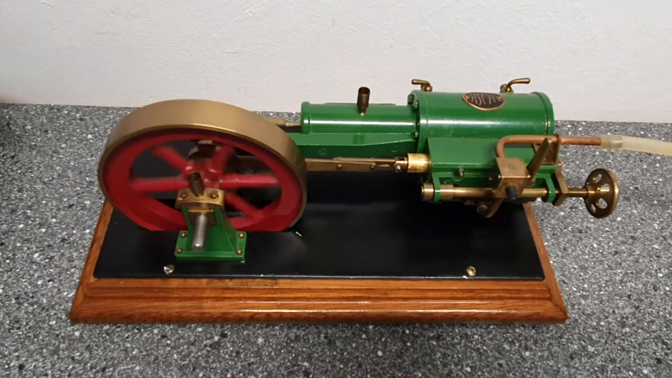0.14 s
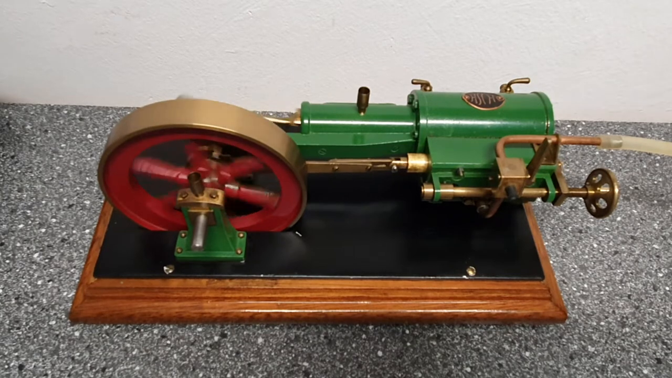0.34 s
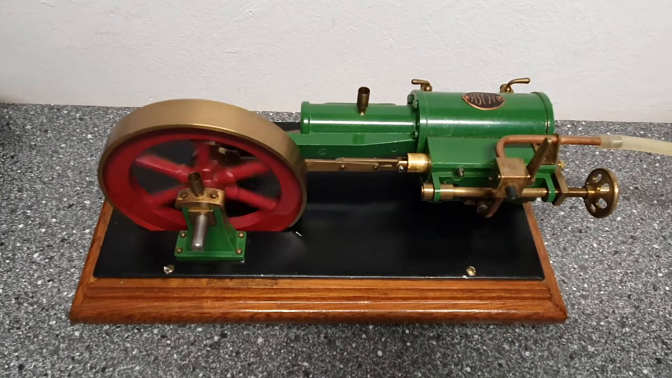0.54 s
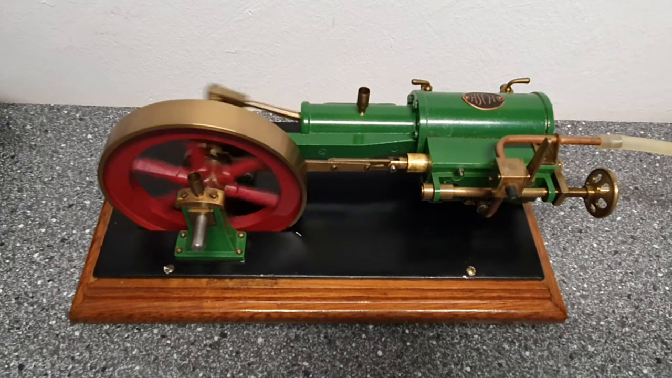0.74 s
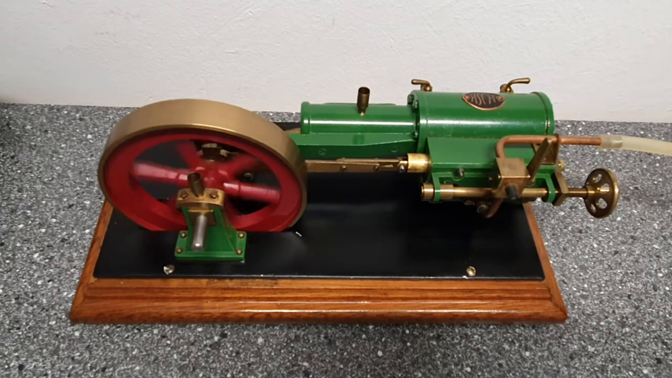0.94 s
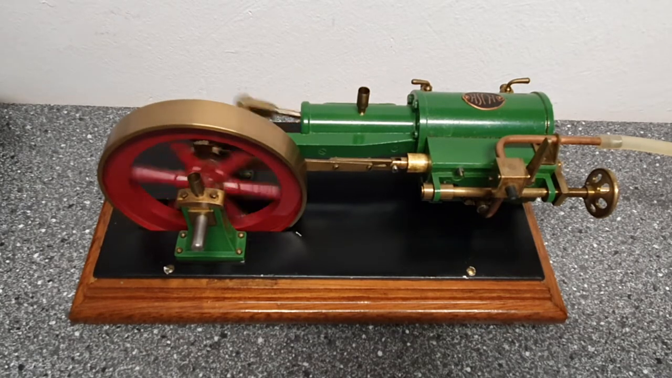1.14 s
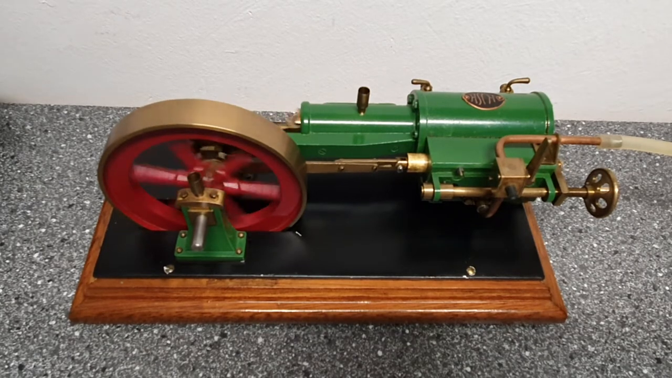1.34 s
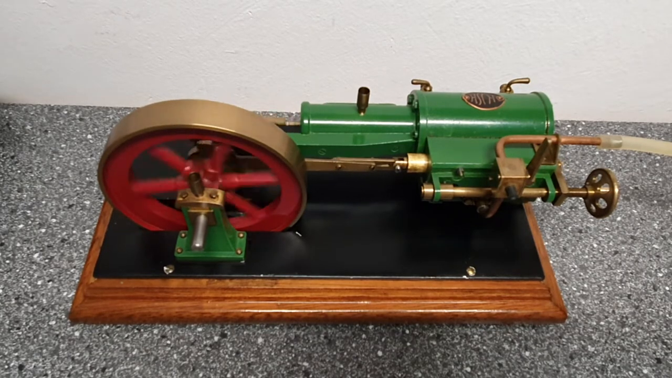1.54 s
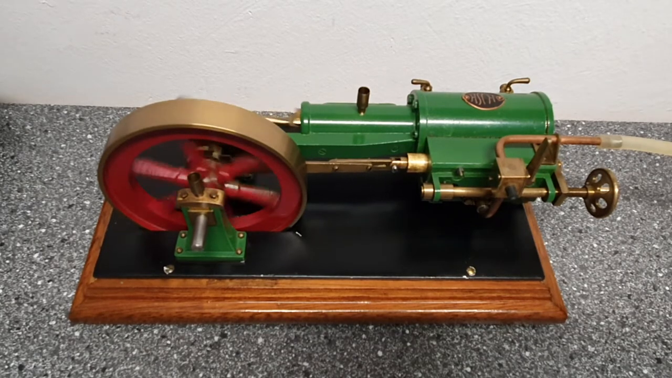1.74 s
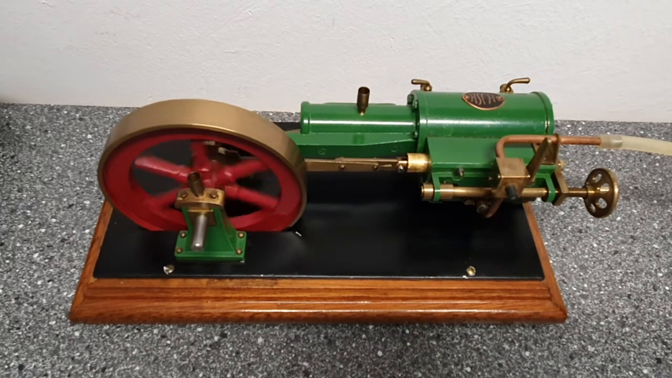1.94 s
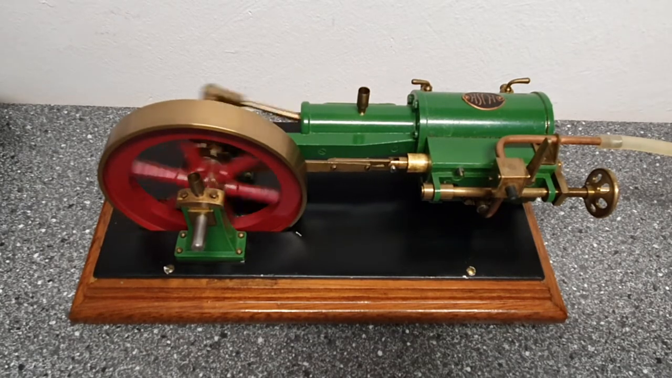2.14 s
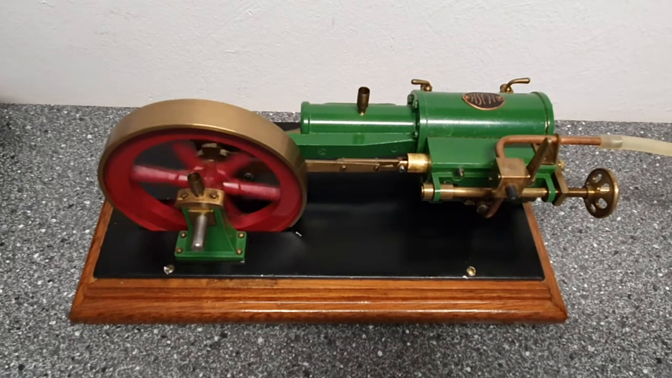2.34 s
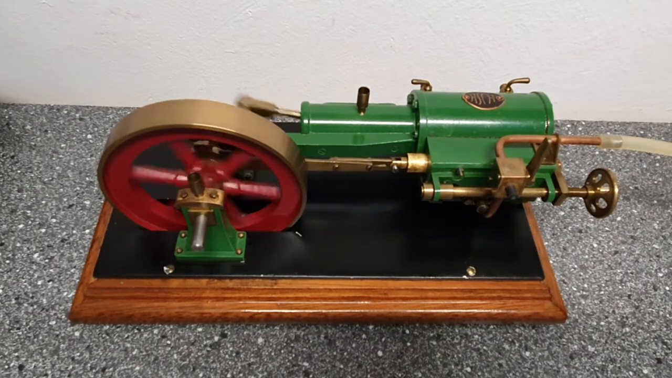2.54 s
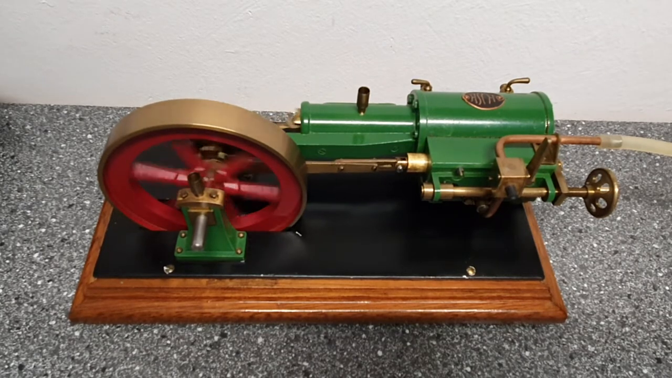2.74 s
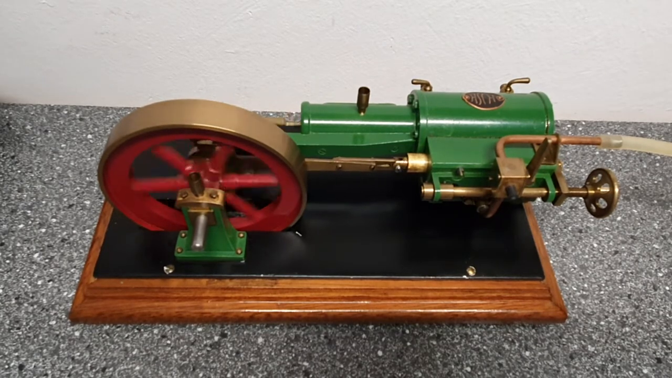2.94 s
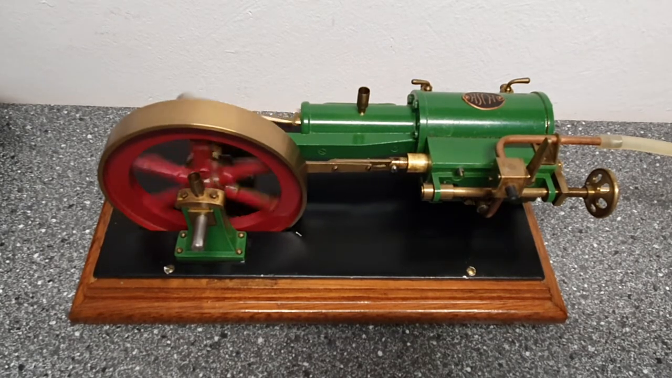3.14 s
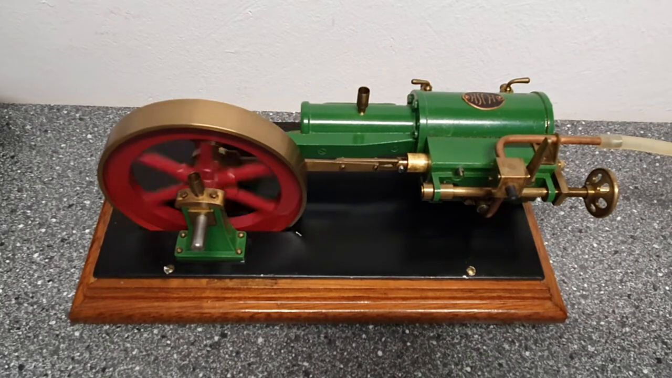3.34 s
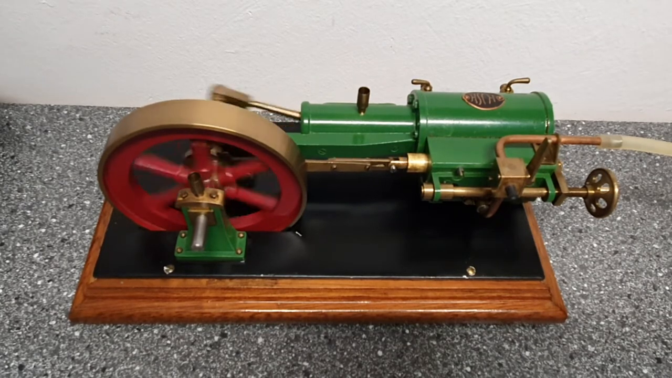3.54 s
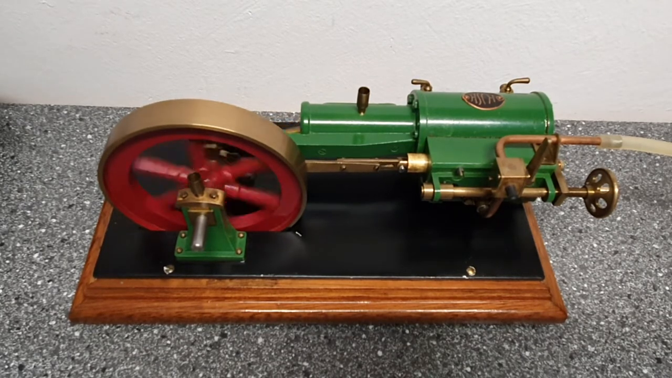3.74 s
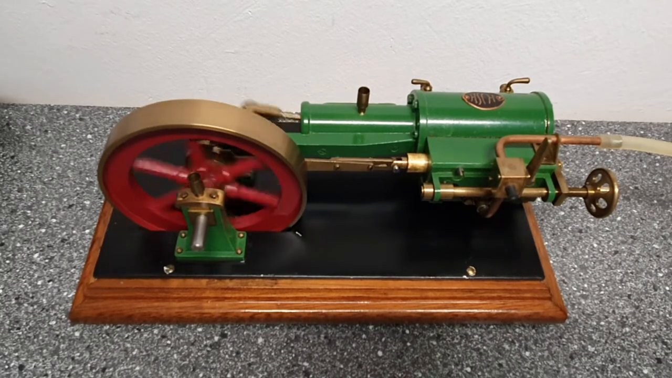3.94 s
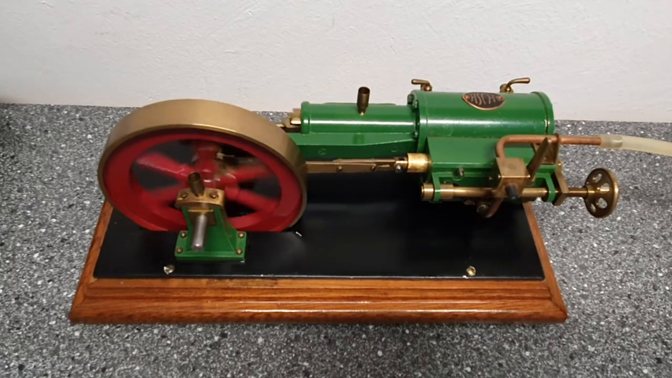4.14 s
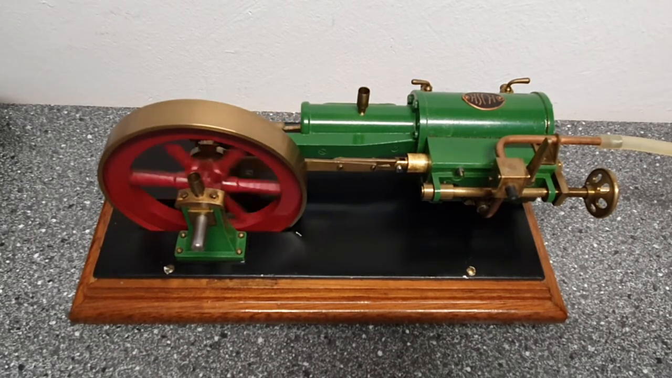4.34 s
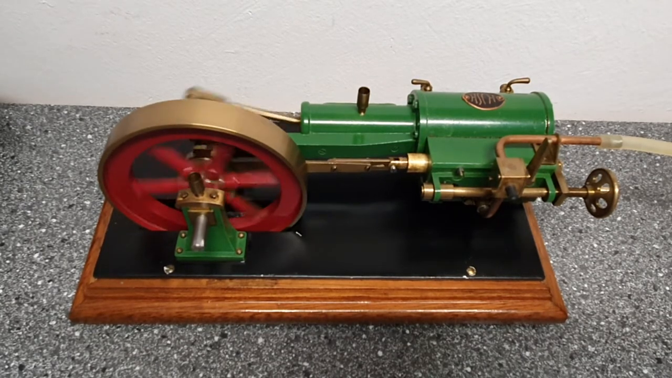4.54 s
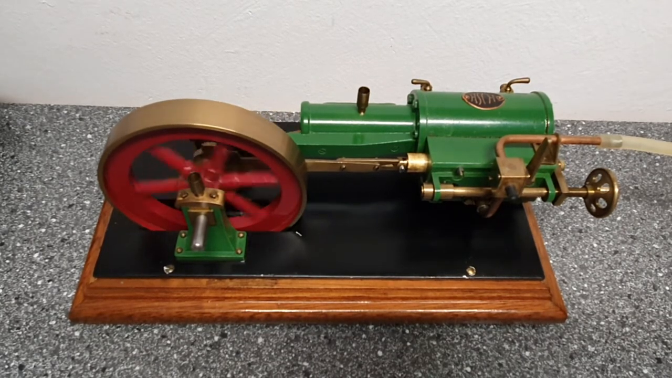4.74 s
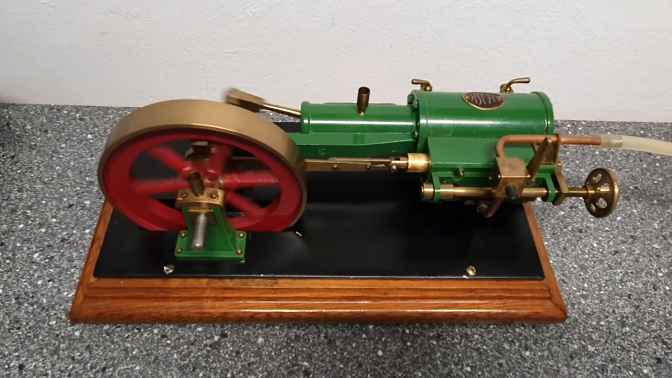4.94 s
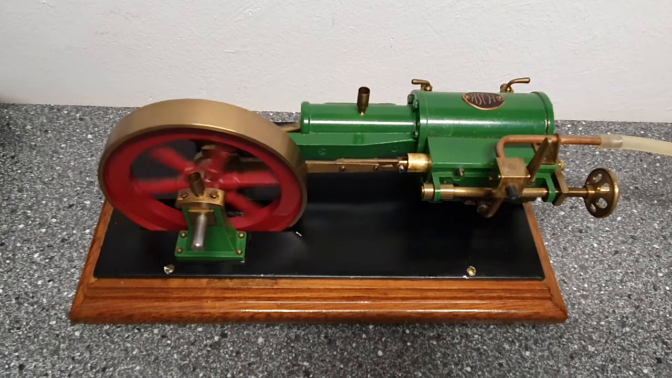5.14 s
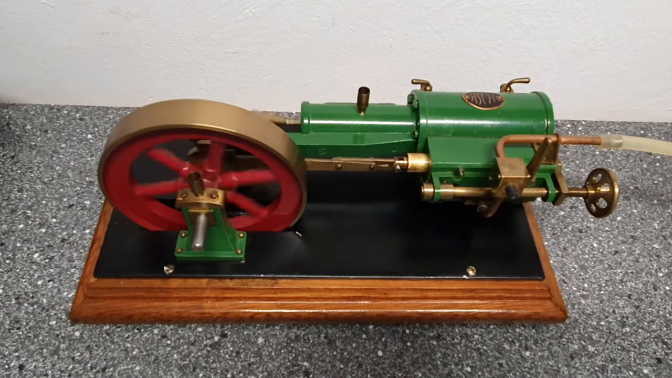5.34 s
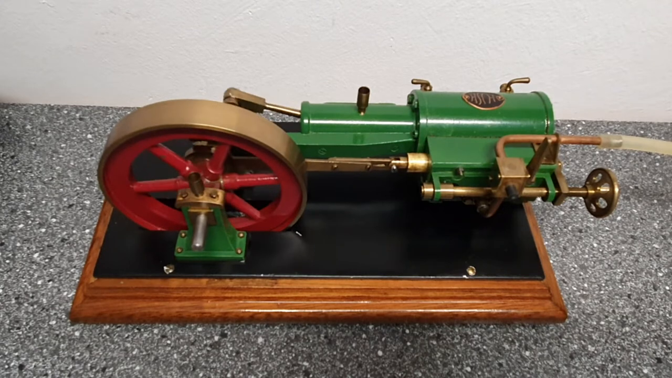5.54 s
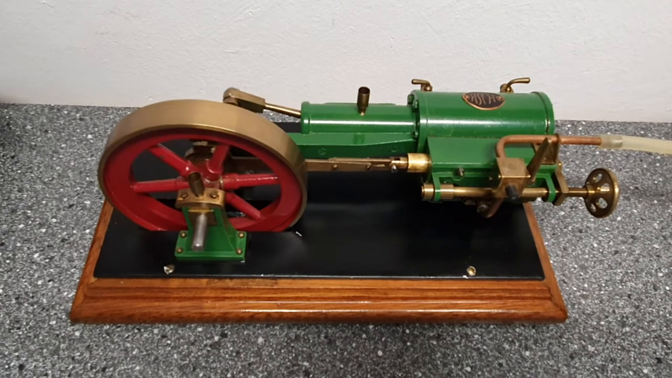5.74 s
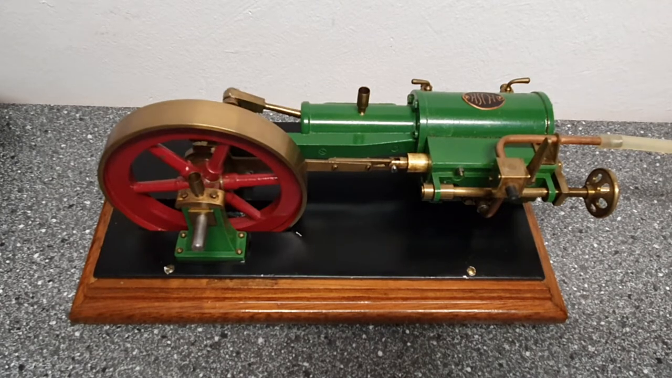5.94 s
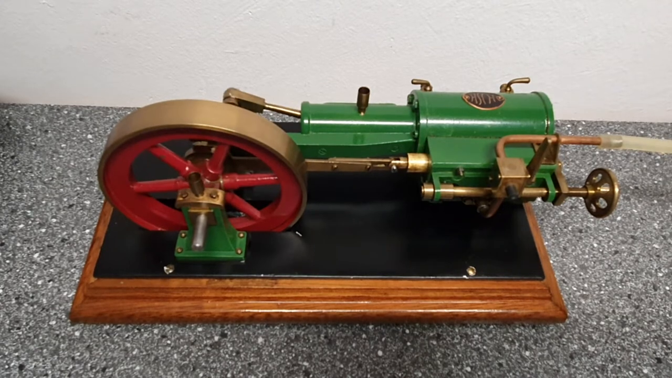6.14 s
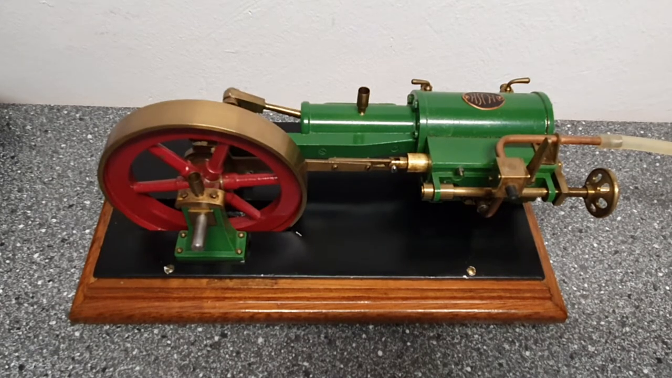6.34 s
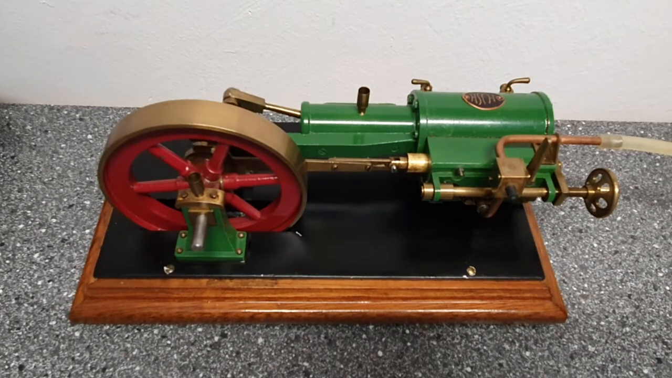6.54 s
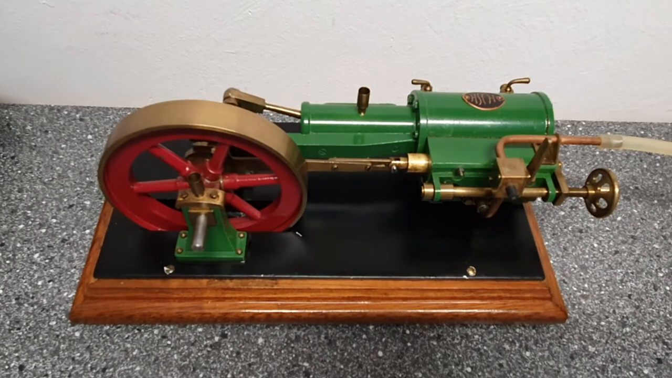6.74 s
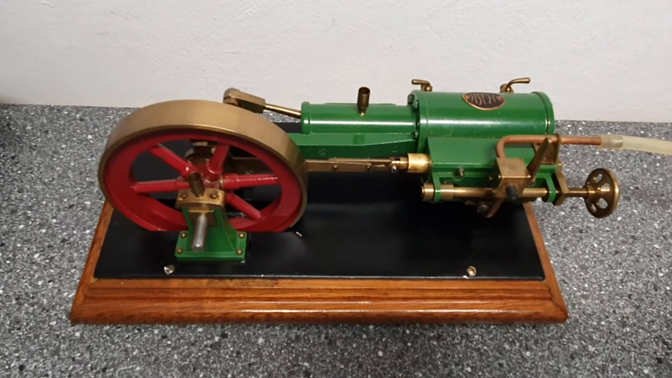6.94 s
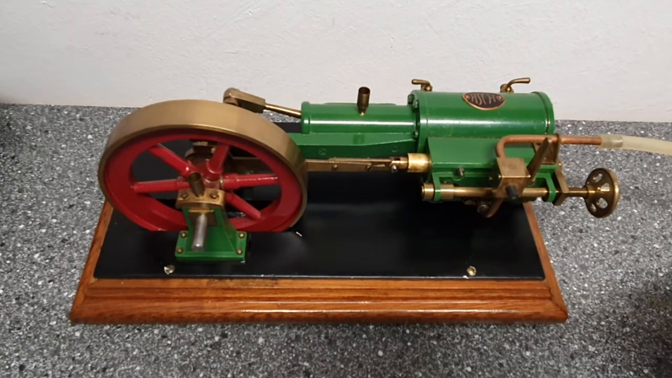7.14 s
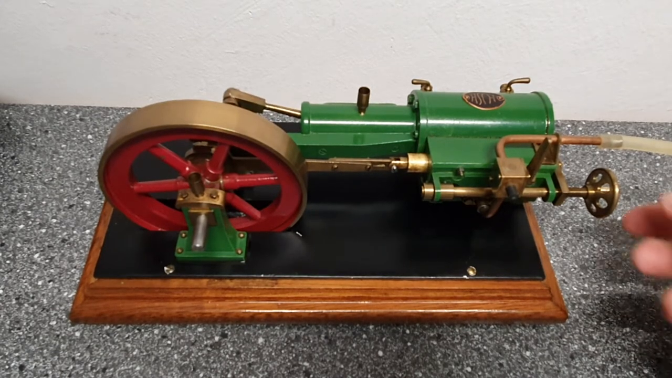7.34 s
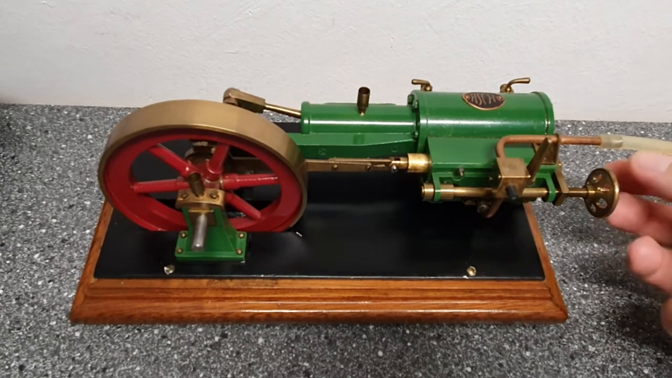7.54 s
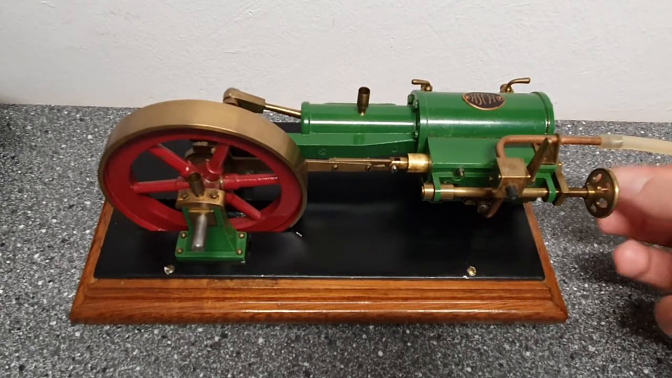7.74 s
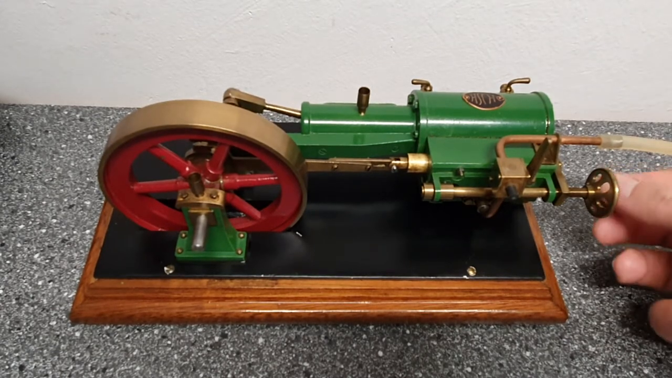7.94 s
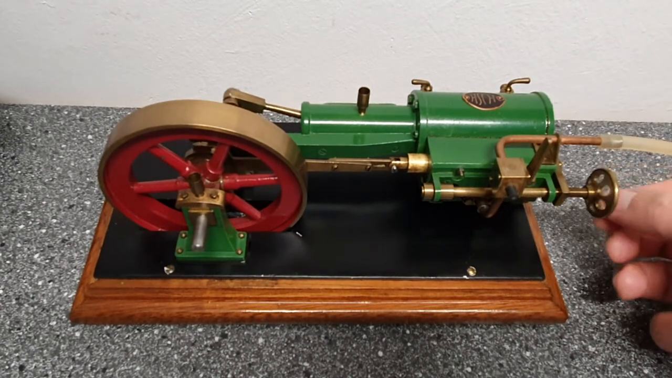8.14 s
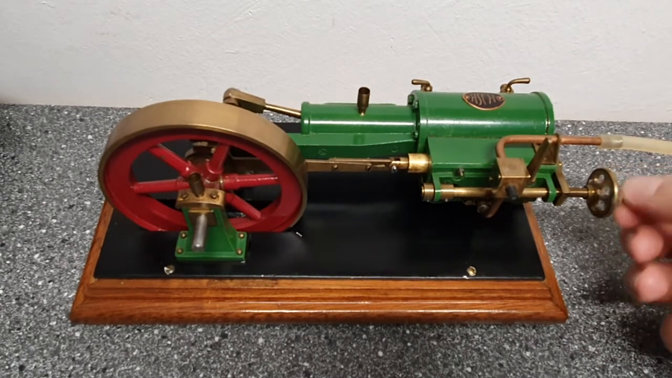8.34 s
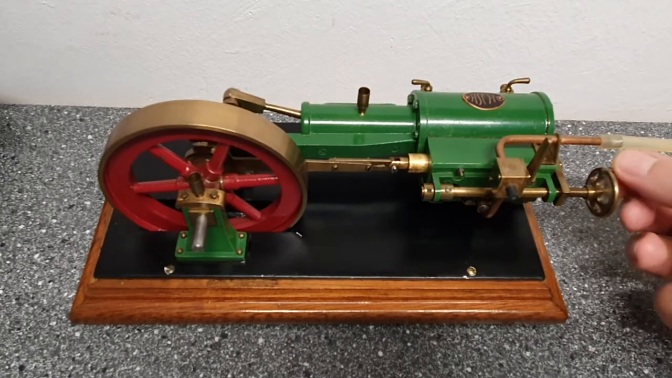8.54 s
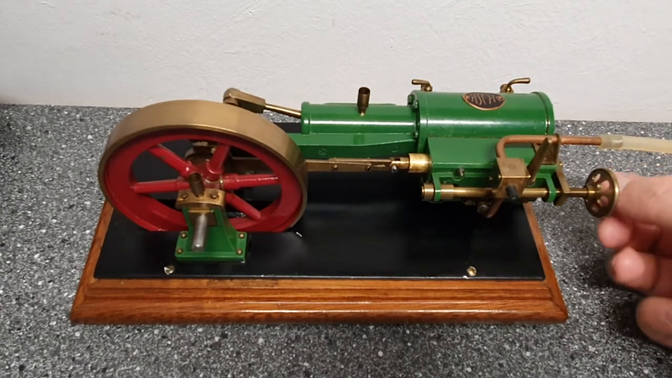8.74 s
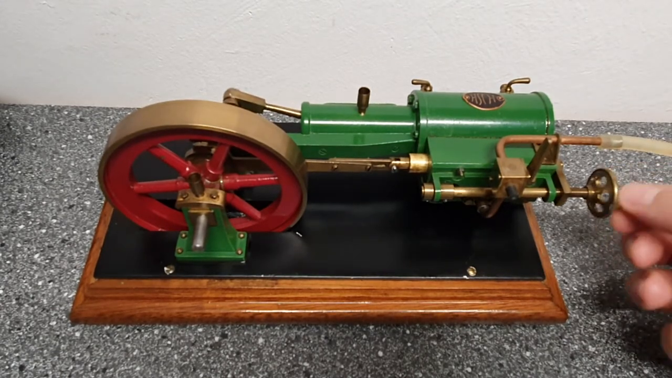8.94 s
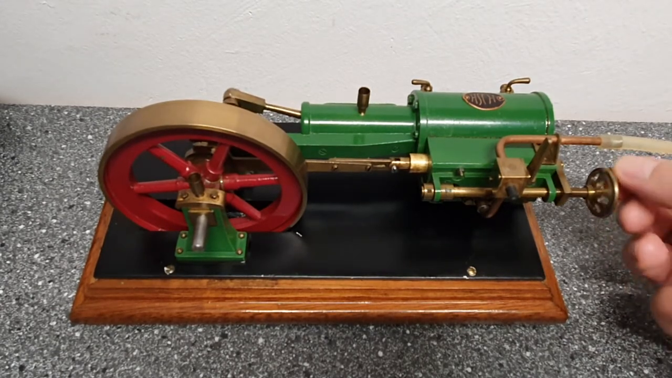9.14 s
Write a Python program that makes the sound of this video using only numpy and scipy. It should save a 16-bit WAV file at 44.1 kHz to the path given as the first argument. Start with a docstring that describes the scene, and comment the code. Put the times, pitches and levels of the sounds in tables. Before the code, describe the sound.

A small compressor hums fast under a pulsing engine hiss, labours, snaps off and coasts to rest; then faint rubs and squeaks in quiet.

```python
"""A hiss pulsing with a small model engine's crank, over the low hum of a piston compressor on the right.
Shaped noise makes the engine's jet and leak; multiples of the shaft speed make the hum. The air is shut
off, the compressor labours against the rising pressure, its switch snaps and it coasts to rest: struck
resonances make the blows, clacks and ticks. A hand then touches the engine's valve wheel in the quiet room,
with soft bumps, narrow-band rubbing and a wavering sine squeak."""
import sys
import numpy as np
from scipy import signal
from scipy.fft import rfft, irfft, next_fast_len
from scipy.io import wavfile
from scipy.ndimage import uniform_filter1d

SR = 44100
rng = np.random.default_rng(int(sys.argv[2]) if len(sys.argv) > 2 else 0)


def volts(x):
    """Linear amplitude factor 10**(x/20) for a level x in dB, scalar or array-like."""
    e = np.asarray(x, float) / 20
    return 10 ** e


def transcribe(u):
    """Save the signal u as a 16-bit wav file named by the first command-line argument.

    u: samples, shape (n,) or (channels, n), limited to [-1, 1]; the rate is SR.
    q: integer samples, one column per channel.
    """
    v = np.clip(np.atleast_2d(u).T, -1, 1)
    q = np.round(v * 32767).astype(np.int16)
    wavfile.write(sys.argv[1], SR, q)


N = 405719
T = np.arange(N) / SR
REST_S = 7.34  # the compressor stands still
MOVING = np.clip((REST_S - T) / 0.035, 0, 1)

# snap of the pressure switch: t/s, impulse level/dB
SNAP = [(7.0277, -27.5)]
SNAP_S = SNAP[0][0]
# modes of the compressor housing: f/Hz, relative level/dB, t60/s
HOUSING = [(70, -11, 0.079), (112, -15, 0.024), (176, -4.5, 0.053), (258, -11, 0.073), (286.3, -9, 0.089),
           (364, -7.5, 0.071)]
# modes of its thin casing: f/Hz, relative level/dB, t60/s
CASING = [(550, -10, 0.022), (664, -8, 0.021), (802, -6.5, 0.061), (854, -6, 0.045), (917, -0.5, 0.04),
          (1049, -3, 0.042), (982, 2, 0.049)]
# casing level law: free level/dB, limit of the change with load/dB, load for two thirds of it,
# change at the snap/dB, slope after it/(dB/s)
RING_LAW = (-39, -1.5, 4.5, -5, -35.5)


def compressor():
    """Superposition of shaft hum, struck casing and valve flow, all tied to one shaft phase."""
    # load on the compressor: t/s, load (0 free, 1 straining, 2 near stall)
    load_course = [(5.47, 0.043), (5.7, 0.4), (6.1, 1.1), (6.8, 2.07), (7.08, 1.53)]
    turns, load = shaft(), curves(load_course)[0]
    whole = np.arange(int(turns[-1]) + 1)
    opening = np.interp(whole[1:] - .09, turns, T)
    spit = valve_spit(turns)
    return (hum(turns, load) + casing_blows(turns, load, whole) + coasting()
            + valve_clack(opening, spit, load) + valve_air(opening, spit, load) + whir(load))


def shaft():
    """Phase is the integral of speed: the motor sags under load, then the flywheel brakes steadily."""
    # powered shaft speed: t/s, speed/(turns/s)
    speed = [(0, 23.601), (5.45, 23.601), (5.8, 22.645), (6.1, 22.373), (6.7, 19.85), (7.03, 19.56)]
    first_turn, coast_hz, brake_hz_per_s = .384, 17.4, 32
    free = T - SNAP_S
    coast = (coast_hz - brake_hz_per_s * free) * (T < REST_S) + 1e-3  # never quite zero
    hz = np.where(free < 0, curves(speed)[0], coast)
    return first_turn + np.cumsum(hz) / SR


def effort(law, load):
    """Saturation: the level in dB moves with load towards a limit, and falls away once the power is cut."""
    free_db, limit_db, knee, cut_db, fade_db = law
    off = T - SNAP_S - .02
    change_db = limit_db * (1 - np.exp(-load / knee))
    return free_db + change_db + (cut_db + fade_db * off) * np.clip(off / 0.033, 0, 1)


def hum(turns, load):
    """Harmonic series of a periodic force, two thumps a turn, filtered by room and floor resonances."""
    # the two thumps: load, phase of first/turn, phase of second/turn, lean of first/cycle
    thumps = [(0, .435, .995, -.28), (1, .48, .86, .07), (2, .48, .81, .16)]
    # room and floor resonances: f/Hz, half width/Hz, rms level at the peak/dB
    resonances = [(42.9, 2.9, -41), (66.57, 4.23, -34), (79.2, 2, -37), (93.8, 2.5, -42), (117.3, 9.5, -39),
                  (143.3, 8.3, -40.5), (168.3, 10.9, -38.5), (204, 5.5, -47.5), (258, 8.8, -51),
                  (288.7, 5, -42), (315.5, 15, -45), (369.8, 14.8, -42.5), (426, 5.1, -52),
                  (449.5, 5.2, -62), (520, 11, -54.5), (562.5, 6, -54.5), (614, 7.5, -55), (661, 8, -55),
                  (692, 14, -61.5), (773, 15, -51), (818.7, 11, -47), (870, 12, -52), (910, 9.7, -46.5),
                  (995, 10, -45), (1044, 12, -46.5), (1080, 12, -55.5)]
    second_size, second_lean, multiples = .8, .2, 46  # lean in cycles
    bass_below_hz, bass_db = 160, -4.5  # the bass sags once the load passes 1
    shade_above_hz, shade_db = 810, -6.5  # the top is shaded from the left port
    thin_above_hz, thin_db, waver_db = 460, -1.5, 0.9  # per unit of load: upper fade, waver of all
    late_above_hz, late_rad = 220, 0.63  # the upper resonances reach the left port later still
    slow = slice(0, None, 100)
    first, second, lean = curves(thumps, load[slow])
    hz = np.gradient(turns)[slow] * SR
    turn = np.exp(2j * np.pi * turns)
    out, multiple = 0, 1
    for k in range(1, multiples + 1):
        multiple = multiple * turn
        pair = np.exp(2j * np.pi * (lean - k * first))
        pair = pair + second_size * np.exp(2j * np.pi * (second_lean - k * second))
        # neighbouring resonances swing in opposite senses and cancel between them
        boom = sum((-1) ** j * volts(db) / (1 + ((k * hz - f) / w) ** 2)
                   for j, (f, w, db) in enumerate(resonances))
        strain_db = thin_db / (1 + (thin_above_hz / (k * hz)) ** 12) + waver_db * walk(9)[slow]
        sag_db = bass_db * np.maximum(load[slow] - 1, 0) / (1 + (k * hz / bass_below_hz) ** 8)
        size = np.sqrt(2) * abs(boom) * volts(load[slow] * strain_db + sag_db)
        wave = np.interp(T, T[slow], size * pair / abs(pair)) * multiple
        late = late_rad / (1 + (late_above_hz / (k * hz[0])) ** 6)
        shade = volts(shade_db / (1 + (shade_above_hz / (k * hz[0])) ** 16))
        out = out + np.array([(wave * np.exp(-1j * late)).real * shade, wave.real])
    return out * np.clip((SNAP_S + 0.028 - T) / 0.033, 0, 1)


def casing_blows(turns, load, whole):
    """Impulse excitation: soft blows at set shaft phases ring the modes of the thin casing."""
    # blows in one turn: phase/turn, relative level/dB
    blows = [(0.358, -7), (0.471, 4.5), (0.861, 2.5)]
    ring_db = effort(RING_LAW, load)
    force = np.zeros(N)
    for share, db in blows:
        at = whole + share + 0.0054 * rng.standard_normal(len(whole))
        at = np.interp(at[(at > turns[0]) & (at < turns[-1])], turns, T)
        force += clicks(at, db + np.interp(at, T, ring_db) + 2.9 * rng.standard_normal(len(at)))
    return volts(-2.5 + 1.5 * load) * indoors(ring(push(force, 0.00092), CASING), -1.9, .13)


def coasting():
    """Free decay of the housing modes after each thump of the unpowered machine."""
    # coasting thumps: t/s, impulse level/dB
    thumps = [(7.053, -29.5), (7.073, -28.5), (7.116, -29), (7.141, -34), (7.168, -39.5), (7.189, -29),
              (7.236, -32), (7.262, -42.5), (7.282, -30), (7.317, -46.5)]
    modes = HOUSING + [(780, 0.5, 0.06), (990, -10.5, .035)]
    return ring(-push(clicks(*np.transpose(thumps)), 0.0016), modes)


def valve_spit(turns):
    """Flow pulse of the delivery valve: a quick rise and exponential decay once a turn."""
    since = ((turns + 0.12) % 1) / np.maximum(np.gradient(turns) * SR, 1)  # seconds
    return since / .002 * np.exp(-since / 0.0052)


def valve_clack(opening, spit, load):
    """Repeated impact: the valve plate lands and bounces, and with the spit it rings the valve head."""
    # landing and bounces: delay after opening/s, relative level/dB
    bounces = [(.004, -2.5), (.0065, -11), (.014, -10), (0.019, -14)]
    # modes of the valve head: f/Hz, relative level/dB, t60/s
    head = [(965, 2, 0.035), (1187, 1.5, 0.018), (1296, 4.5, 0.028), (1453, 2, .022), (1550, 1.5, 0.018),
            (1750, 0, 0.02), (1771, -8.5, 0.034), (2540, -27.5, 0.025)]
    # clack level law: columns as in RING_LAW
    clack_law = (-48.5, 16, .7, -14.5, -80)
    plate = np.zeros(N)
    for delay, db in bounces:
        chance = rng.standard_normal((len(opening), 2))
        plate += clicks(opening + delay + .0001 * chance[:, 0], db + .8 * chance[:, 1])
    # under load the plate lands harder, so brighter
    hard = np.clip(.4 * load, 0, 1)
    landing = (1 - hard) * push(plate, 0.00051) + hard * push(plate, 0.0004)
    landing = lowpass(landing, 4, 1900)
    clack = level(ring(landing + .008 * spit * rng.standard_normal(N), head), 0)
    return indoors(clack * volts(effort(clack_law, load)) * MOVING, -12, .13)


def valve_air(opening, spit, load):
    """Turbulent flow noise gated by the valve, with pipe resonances and chattering fittings."""
    # spectrum of the air let through: f/Hz, gain/dB
    puff = [(1120, -29.5), (1900, -1), (2360, -5.5), (2560, -1), (2770, -4.5), (3900, -8.5), (5490, -11),
            (8010, -1.5), (9330, -16), (12100, -6), (13600, -5.5), (15300, -9.5), (16300, -29.5)]
    # pipe resonances: f/Hz, relative level/dB, t60/s
    pipe = [(6820, 0, .015), (8260, -2, .015), (12300, -1, .012), (13800, -1, .012)]
    # modes of loose fittings: f/Hz, relative level/dB, t60/s
    fittings = [(2150, -4.5, .03), (2620, 0, 0.033), (3830, -2, .025), (4550, -3.5, .02)]
    # air level law: columns as in RING_LAW
    air_law = (-63.5, 20, 0.95, -2, -44)
    gush = (spit * volts(-220 * np.maximum(T - SNAP_S, 0)) + .04) * noise(0.13)
    # a duller seep goes on between the spits
    seep = lowpass(colour(noise(.3), puff), 2, 3800)
    # loose fittings chatter at random, and ring when the plate has landed
    chatter = ring((rng.random(N) < 90 / SR) * rng.standard_normal(N), fittings)
    chance = rng.standard_normal((len(opening), 2))
    jolts = clicks(opening + .016 + .002 * chance[:, 0], 3.0 * chance[:, 1] - 60 * (opening > SNAP_S))
    loose = level(chatter, 0) + level(ring(jolts, fittings), 4.5)
    between = level(seep, 1.5) * volts(-4.5 * load) + level(loose, -13)
    between = between * MOVING * volts(-11 * (T > SNAP_S))
    whistle = level(ring(np.gradient(gush, axis=1), pipe), -11.5)
    air = level(colour(gush, puff), 0) + between + whistle
    return indoors(air * volts(effort(air_law, load)), -7.0, .11)


def whir(load):
    """Random excitation: steady noise keeps the housing and casing modes sounding."""
    whir_db = effort(RING_LAW, load) - 4.8 * (T > SNAP_S) - 1.6 * load
    sound = level(ring(rng.standard_normal(N), HOUSING + CASING), -3.5) * volts(whir_db)
    return indoors(sound * MOVING, -0.84, 0.092)


def engine():
    """Amplitude modulation: jet noise and gland leak follow the crank; a double knock each turn."""
    # start of exhaust: t/s, level change at the start of the chuff/dB, impulse level of the turn's knock/dB
    crank_starts = [(0.014, -0.5, -30.5), (0.4813, -0.5, -38), (0.9434, -2.7, -36), (1.4078, -1.5, -36),
                    (1.8758, -2, -38.5), (2.3394, -0.7, -33.5), (2.809, -1.5, -34.5), (3.2852, -2.5, -33),
                    (3.7534, -2, -35.5), (4.238, -3, -35), (4.7069, -2, -32), (5.1906, -2, -32)]
    # exhaust jet spectrum: f/Hz, gain/dB
    exhaust_tone = [(650, -43.5), (1100, -3.5), (1410, -15.5), (1560, -3.5), (1830, -10), (2200, -2),
                    (3500, -12.5), (3890, -8.5), (5500, -4.5), (6410, -1.5), (7060, 1), (7630, 4),
                    (8080, 3), (9160, -36), (11000, -13), (14300, -64), (22000, -120)]
    # exhaust port resonances: f/Hz, relative level/dB, t60/s
    port = [(2480, -6, 0.02), (6800, -7, 0.029), (7700, -8.5, 0.055), (7500, -6.5, 0.007)]
    # gland leak spectrum: f/Hz, gain/dB
    leak_tone = [(5000, -9), (8500, 2.5), (8840, 0), (9700, 0), (10600, 1.5), (12000, 8), (12900, 2),
                 (13700, 6.5), (15300, 5.5), (16000, -47.5)]
    # modes of the board: f/Hz, relative level/dB, t60/s
    board = [(250, 5, 0.16), (281, 3.5, 0.12)]
    last_turn_s = 0.64  # without air the wheel slows
    knock_at, slack_at, slack_db = .455, .36, 1  # turns; the slack in the rod knocks first
    air_db, shut_off_s, fade_db_per_s = 2, 5.352, -170
    s, chuff_db, knock_db = np.transpose(crank_starts)
    s = np.concatenate([[2 * s[0] - s[1]], s, [s[-1] + last_turn_s]])
    crank = np.interp(T, s, np.arange(len(s))) % 1
    exhaust_db, leak_db, top_db = stroke(crank)
    # each chuff starts with its own strength
    exhaust_db = exhaust_db + np.interp(T, s[1:-1], chuff_db) * np.exp(-crank / 0.097)
    jet = noise(0.56)
    whistle = level(ring(np.gradient(jet, axis=1), port), -54.5)
    jet = level(colour(jet, exhaust_tone), -32.5) + whistle
    # the lower part of the jet swings wider with the flow
    low = lowpass(jet, 2, 3200)
    exhaust = jet + low * (volts(.5 * exhaust_db + 2.5) - 1)
    exhaust = exhaust * volts(exhaust_db + 0.8 * walk(21.95))
    leak = level(colour(noise(0.75), leak_tone), -36.5)
    top = colour(leak, [(12500, -40), (13100, 0)])
    leak = (leak + top * (volts(top_db) - 1)) * volts(leak_db + 0.63 * walk(18))
    hiss = (exhaust + leak) * volts(air_db + fade_db_per_s * np.maximum(T - shut_off_s, 0))
    start, turn = s[1:-1], np.diff(s)[1:]
    blows = clicks(start + knock_at * turn, knock_db)
    blows = blows + clicks(start + slack_at * turn, knock_db + slack_db)
    return indoors(hiss, -3.0, .08) + ring(push(blows, 0.0041), board)


def stroke(crank):
    """Flow follows the crank angle: the outward stroke is louder than the return, with swells and dips."""
    # swells and dips: phase/turn, width/turn, exhaust change/dB, gland leak change/dB,
    # extra change of the leak's top/dB
    swells = [(.022, 0.025, 7.5, 4, -1), (.23, .04, 1, -0.1, 0.2), (.37, 0.04, -1.5, 3, -0.5),
              (.41, 0.04, 4, -1, -1), (.55, .035, -1, 3, 2), (.92, 0.04, -2, 2.2, 0.5),
              (.98, .03, 0, 0.5, 5)]
    out_db, return_db, leak_out_db, leak_return_db, return_at = -3.5, -6, -1.5, -3, .46
    back = np.clip((crank - return_at) / 0.0088, 0, 1) * np.clip((1 - crank) / 0.0067, 0, 1)
    exhaust_db = out_db + (return_db - out_db) * back
    leak_db = leak_out_db + (leak_return_db - leak_out_db) * back
    top_db = 0
    for share, width, a_db, b_db, c_db in swells:
        bell = np.exp(-(((crank - share + .5) % 1 - .5) / width) ** 2 / 2)
        exhaust_db, leak_db, top_db = exhaust_db + a_db * bell, leak_db + b_db * bell, top_db + c_db * bell
    return exhaust_db, leak_db, top_db


def switch():
    """Modal ringing after one hard snap with a short rattle, then faint ticks as things settle."""
    # switch modes: f/Hz, relative level/dB, t60/s
    modes = [(1266, -14, 0.02), (1890, -20.5, .006), (2650, -14, 0.013), (3160, -8.5, .008),
             (4100, -12, 0.0056), (4790, -3, 0.022), (4970, -2, 0.025), (5490, -7.5, 0.014),
             (6480, -4, 0.044), (6600, -12, 0.04), (6750, -6.5, .03), (7150, 0, 0.05), (7330, -2, 0.04),
             (7500, 0, 0.008), (8060, -8.5, .03), (8200, -7.5, 0.051), (9830, -14, 0.03),
             (13800, -15.5, 0.0101)]
    # ticks: t/s, peak level at the source/dB, f/Hz
    tick_list = [(7.091, -46, 2640), (7.147, -42, 2650), (7.148, -58, 4750), (7.148, -60, 4150),
                 (7.165, -54, 1730), (7.168, -48, 980), (7.195, -48, 780), (7.206, -47, 2620),
                 (7.241, -58, 4550), (7.24, -58, 3430), (7.255, -45, 2600), (7.263, -52, 1070),
                 (7.285, -63, 2150), (7.288, -45, 796), (7.3, -71, 2160), (7.347, -72, 2700),
                 (7.447, -50.5, 2650), (7.541, -74, 2700), (7.642, -67, 2650), (7.752, -79, 2700)]
    i = np.arange(600)
    rattle = 0.15 * rng.standard_normal(600) * np.exp(-i / 90.0) + 4.3 * (i == 0)
    snap = signal.fftconvolve(clicks(*np.transpose(SNAP)), rattle)[:N]
    snap = indoors(indoors(ring(snap, modes), -6, 0.15), -23.5, 0.27)
    scratch = np.gradient(push(rng.standard_normal(600), .0001))[:600] * np.hanning(600)
    ticks = 0
    for s, db, hz in tick_list:
        ticks = ticks + narrow(clicks([s], [db]), hz, 0.027)
        ticks = ticks + signal.fftconvolve(clicks([s], [db - 13]), scratch)[:N]
    return snap + indoors(ticks, -12, 0.036) * volts([[3], [-3]])


def hand():
    """Contact and friction: dull bumps through the board; the turned wheel rubs and squeaks."""
    # soft bumps: t/s, peak level/dB, f/Hz
    bump_list = [(8.19, -64, 250), (8.642, -55, 240), (8.672, -50, 200), (8.72, -59, 245),
                 (9.057, -46, 258), (9.059, -61, 430), (9.068, -43.5, 258), (9.181, -59, 240)]
    # rubbing bands of the wheel: f/Hz, width/Hz, relative level/dB
    wheel = [(805, 51, -5), (994, 51, 7), (583, 250, -14), (1346, 90, -19)]
    # nudges of the wheel: loudest t/s, length/s, rub gain/dB, squeak gain of the spindle/dB
    nudges = [(8.201, 0.019, -66, -100), (8.33, .03, -74, -83), (8.417, 0.071, -65.5, -82),
              (8.58, 0.075, -83, -101.5), (8.683, 0.052, -77, -82), (8.745, .07, -80, -90),
              (8.885, .04, -87, -105), (8.991, 0.055, -76, -83), (9.065, .07, -75, -100),
              (9.181, 0.039, -71, -92)]
    out = sum(narrow(clicks([s], [db]), hz, 0.062) for s, db, hz in bump_list)
    rub = sum(level(narrow(rng.standard_normal(N), hz, 1.73 / w), db) for hz, w, db in wheel)
    phase = 2 * np.pi * np.cumsum(3400 + 18 * walk(90)) / SR
    squeak = level(np.sin(phase) * volts(1.5 * walk(60)), 0)
    for s, length, rub_db, squeak_db in nudges:
        out = out + np.exp(-(2 * (T - s) / length) ** 2) * volts(rub_db) * rub
        out = out + np.exp(-((T - s) / length) ** 2) * volts(squeak_db) * squeak
    return out


def room():
    """Broadband and resonant noise: faint air and a low rumble that settles after the stop."""
    # room tone spectrum: f/Hz, gain/dB
    tone = [(100, -41.5), (170, -16), (249, 4.5), (312, -13), (1380, -21), (2300, -25.5), (2480, -22.5),
            (2890, -22), (5840, -33), (7920, -20), (8870, -41), (16000, -37)]
    rumble_db, settle_db, settle_s = -68, 18.5, 0.11  # louder while the machine moves
    modes = [(45.05, -9.5, 0.41), (90.3, -6.0, 0.33), (124, -4.5, 0.1), (245, -13.5, 0.11)]
    air = level(colour(noise(0.14), tone), -76.5)
    rumble = level(ring(rng.standard_normal(N), modes), 0)
    settling = np.exp(-np.maximum(T - REST_S + 0.046, 0) / settle_s)
    throb = level(ring(rng.standard_normal(N), [(80, 0, .3)]), -61.5)
    throb = throb * volts(-12 * np.maximum(T - REST_S, 0))
    return air + throb + rumble * volts(rumble_db + settle_db * settling)


def level(x, db):
    """Normalisation of the mean square: set the rms level."""
    return x * volts(db) / np.sqrt(np.mean(x ** 2))


def curves(table, at=T):
    """Linear interpolation of every column against the first."""
    s, *columns = np.transpose(table)
    return [np.interp(at, s, c) for c in columns]


def lowpass(x, order, hz):
    """Butterworth low-pass filtering: the treble rolls off above the corner."""
    return signal.sosfilt(signal.butter(order, hz, fs=SR, output="sos"), x)


def colour(x, table, share=1):
    """Spectral filtering by (f/Hz, gain/dB) points on a log-frequency axis."""
    hz, db = np.transpose(table)
    size = next_fast_len(N + 8192)
    f = np.log(np.fft.rfftfreq(size, 1 / SR) + 1)
    gain = volts(share * np.interp(f, np.log(hz), db))
    return irfft(rfft(x, size) * gain, size)[..., :N]


def clicks(s, db):
    """Fractional delay: impulses shared between the two nearest samples."""
    at = np.asarray(s) * SR
    i = at.astype(int)
    early = np.bincount(i, volts(db) * (1 - at + i), N + 1)[:N]
    return early + np.bincount(i + 1, volts(db) * (at - i), N + 1)[:N]


def ring(x, modes):
    """Modal synthesis: a sum of decaying resonances; neighbours swing in opposite senses."""
    out = 0
    for k, (hz, db, t60) in enumerate(modes):
        pole = np.exp((2j * np.pi * hz - np.log(1000) / t60) / SR)
        out = out + (-1) ** k * volts(db) * signal.lfilter([1], [1, -pole], x).imag
    return out


def narrow(x, hz, t60):
    """Cascaded resonance: one mode twice over has steep skirts; its peak matches that of the input."""
    twice = ring(ring(x, [(hz, 0, t60)]), [(hz, 0, t60)])
    return twice * np.max(abs(x)) / np.max(abs(twice))


def push(x, seconds):
    """Contact duration: a softer contact spreads the force over a bell of this length."""
    bell = np.hanning(int(seconds * SR) + 2)
    return signal.fftconvolve(x, bell / bell.sum())[:N]


def walk(rate):
    """Smoothed random steps: slow chance, spread near 1."""
    k = int(SR / rate)
    steps = np.repeat(rng.standard_normal(N // k + 1), k)
    return 1.3 * uniform_filter1d(uniform_filter1d(steps, k), k)[:N]


def noise(alike):
    """Interaural coherence: two channels of noise with a part in common."""
    a = np.clip(alike, 0, 1)
    return np.sqrt(a) * rng.standard_normal(N) + np.sqrt(1 - a) * rng.standard_normal((2, N))


def indoors(x, wet_db, t60):
    """Diffuse reverberation: hard walls add a different decaying noise tail at each ear."""
    t = np.arange(int(t60 * SR)) / SR
    tail = rng.standard_normal((2, len(t))) * volts(-60 * t / t60) * (t > .002)
    tail = tail / np.sqrt(np.sum(tail ** 2, axis=1, keepdims=True))
    return x + volts(wet_db) * signal.fftconvolve(np.atleast_2d(x), tail, axes=1)[:, :N]


def scene():
    """Superposition at two microphone ports, with differences in arrival time and spectrum."""
    # spectral balance of the ports: f/Hz, left minus right level/dB
    tilt = [(60, -2), (110, 0), (200, 0.5), (380, -1), (700, -6), (1290, -3), (2380, -0.5), (4400, -5.5),
            (8120, -3.5), (15000, -7.5)]
    left_lag = 21  # samples
    left, right = compressor() + engine() + switch() + hand() + room()
    # the left port hears everything later and mostly duller
    left = np.append(np.zeros(left_lag), left[:-left_lag])
    return np.array([colour(left, tilt, share=.5), colour(right, tilt, share=-.5)])


def band_limit(x):
    """A steep low-pass at the top of the band."""
    return signal.sosfilt(signal.butter(12, 16840, fs=SR, output="sos"), x)


def record(dry):
    """High-pass response: the microphone drops the deepest bass."""
    mix = signal.sosfilt(signal.butter(2, 40, "high", fs=SR, output="sos"), dry)
    return band_limit(mix)


dry = scene()
out = record(dry)
transcribe(out)
```